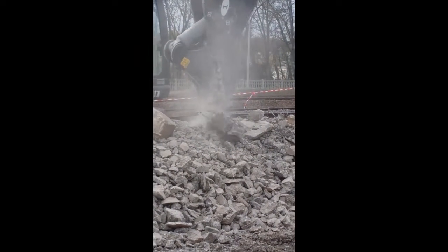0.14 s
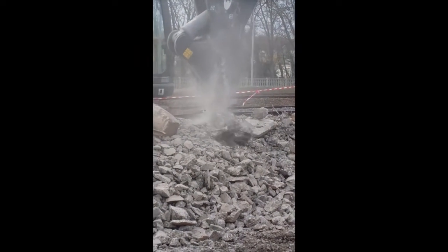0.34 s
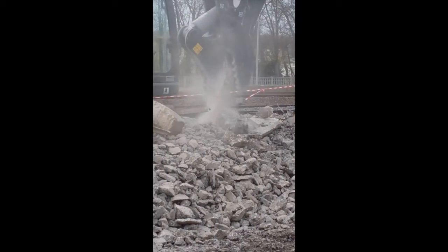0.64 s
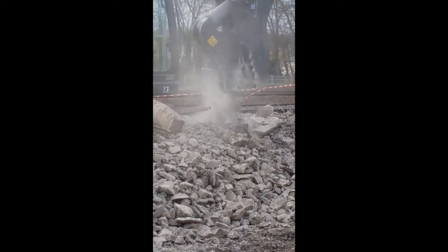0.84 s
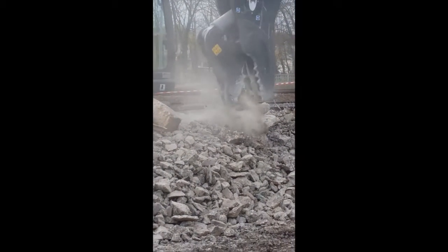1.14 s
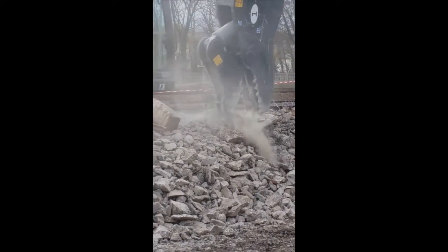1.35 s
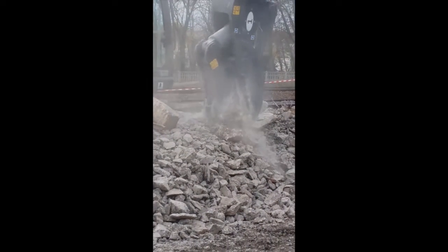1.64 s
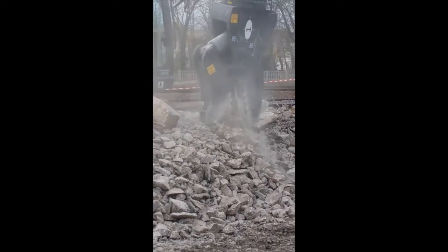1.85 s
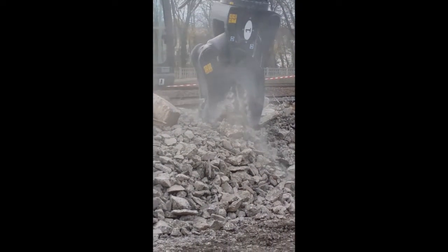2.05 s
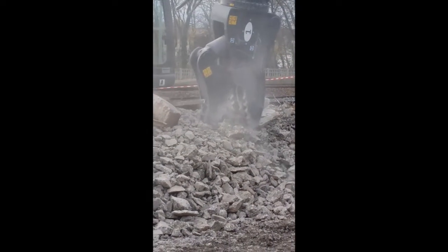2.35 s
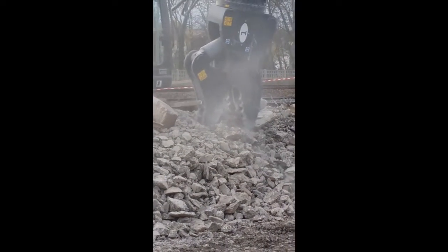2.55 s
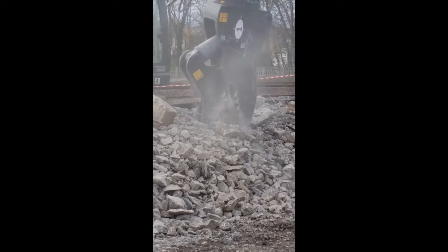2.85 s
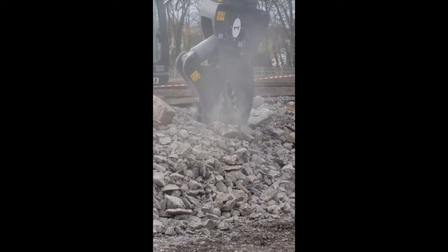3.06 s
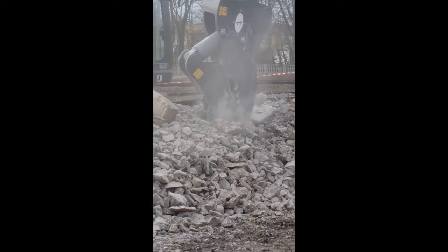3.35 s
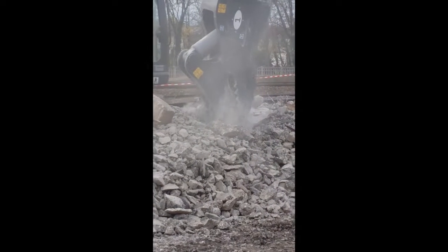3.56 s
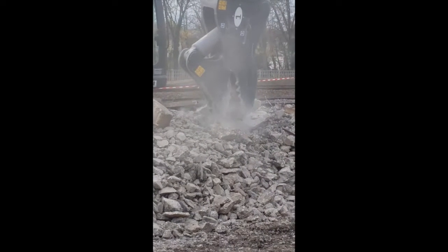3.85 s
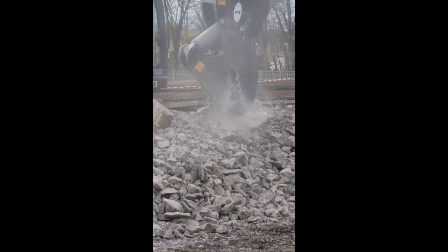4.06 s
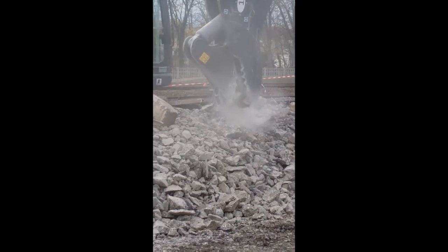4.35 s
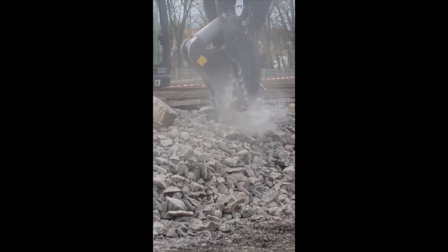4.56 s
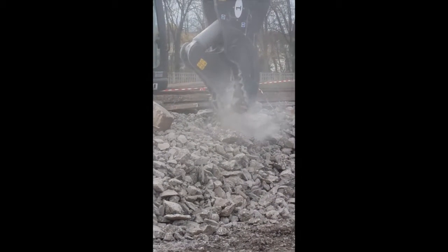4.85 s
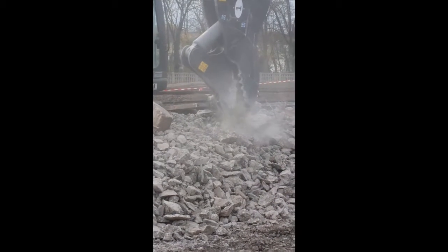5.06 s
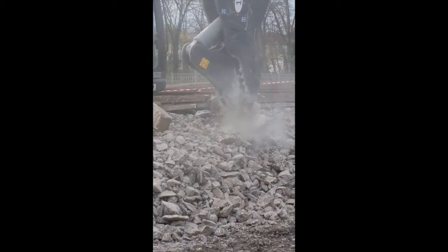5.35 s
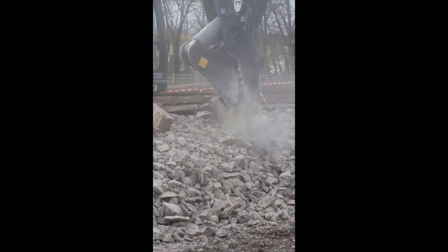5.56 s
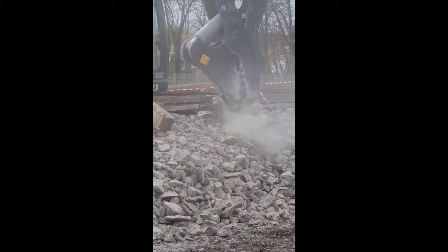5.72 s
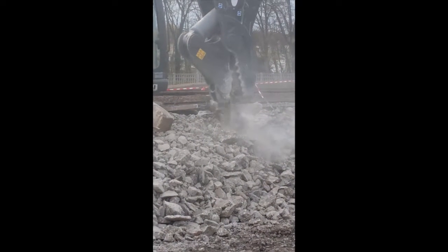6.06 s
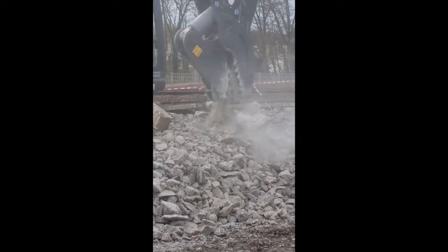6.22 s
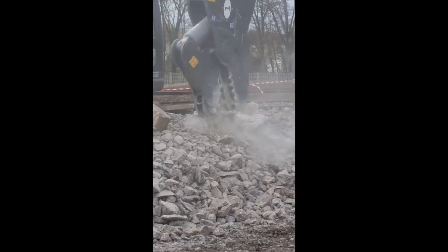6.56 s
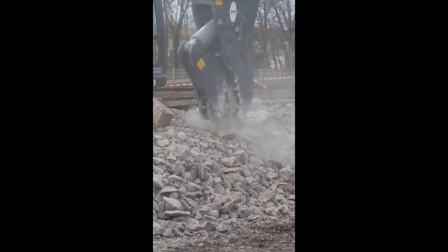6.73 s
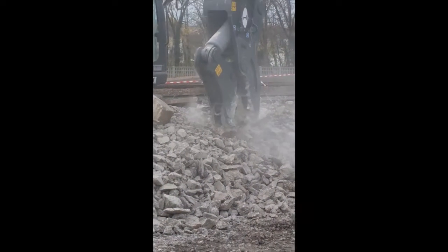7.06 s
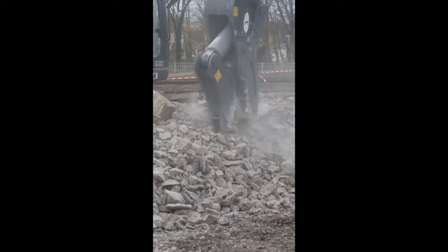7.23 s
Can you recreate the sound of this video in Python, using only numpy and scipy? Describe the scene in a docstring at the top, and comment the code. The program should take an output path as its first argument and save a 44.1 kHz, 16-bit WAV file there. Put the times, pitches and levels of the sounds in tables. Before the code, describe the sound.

An excavator engine hums low and unsteadily throughout at an open demolition site, with light microphone hiss. From about 0.4 to 1.9 seconds a thin pump whine wavers over it, with faint cracks, trickling grit, a few stony clinks and tiny high squeaks toward the right. Cracking builds from 2.5 seconds, and from 2.75 to 3.9 the jaws crush concrete in a loud, dense burst: sharp snaps, gritty crunching, short mid-pitched steel ringing and heavy low thuds through the boom. A lull follows near 4.2, with a clink at 4.4. A brief faint scraping squeal at 4.8 leads into a second crunching burst, 4.9 to 5.5. Then it quiets; the whine returns around 6 to 7.1 with light clinks, clearest near 6.75. At 7.3 the jaws bite again with a hard crack and thud. Bass and steel sound stronger at the left.

```python
"""On a demolition site a hydraulic crusher bites concrete in bursts: force-shaped noise and decaying tones
ring its steel jaws and teeth and thud through the boom. An engine hums behind with wavering tones and
filtered noise, beside a gliding pump whine; fragments clink as short tone clusters, faint squeaks glide
at the right. Two microphone ports hear most of the bass nearly alike, louder at the left, and the treble differently."""
import sys
import numpy as np
from scipy import signal
from scipy.fft import rfft, irfft, next_fast_len
from scipy.io import wavfile
from scipy.ndimage import uniform_filter1d

SR = 44100
rng = np.random.default_rng(int(sys.argv[2]) if len(sys.argv) > 2 else 0)


def pcm_store(signal):
    """Save signal as 16-bit PCM."""
    levels = np.round(np.clip(np.atleast_2d(signal), -1, 1) * 32767)
    wavfile.write(sys.argv[1], SR, levels.astype(np.int16).T)


N = 325899
T = np.arange(N) / SR
EDGE_HZ = 15600  # upper band limit
# Source levels are relative: scene() sets the final balance.


def gain_of(db):
    """Turns decibels into an amplitude factor."""
    return 10 ** (np.asarray(db) / 20)


def evened(x):
    """Scales to unit rms."""
    return x / np.sqrt(np.mean(x ** 2) + 1e-20)


def read(points, hz):
    """Reads a curve of (frequency, value) points along a log frequency axis."""
    f, value = np.transpose(points)
    return np.interp(np.log(hz + 1), np.log(f + 1), value)


def add(mix, s, sound):
    """Adds a sound into the mix from s seconds on, cut at the end."""
    part = mix[..., round(s * SR):][..., :sound.shape[-1]]
    part += sound[..., :part.shape[-1]]


def filtered(x, response):
    """Applies a frequency response given as a function of Hz."""
    size = next_fast_len(N + SR // 2)
    return irfft(rfft(x, size) * response(np.fft.rfftfreq(size, 1 / SR)), size)[..., :N]


def modes(table):
    """Response of a body: resonances of alternating sign, unit gain for white noise."""
    def response(hz):
        h = 0
        for k, (f, width, db) in enumerate(table):
            resonance = width * hz / (hz * width + 1j * (hz ** 2 - f ** 2))
            h = h + (-1) ** k * gain_of(db) * resonance
        return h / np.sqrt(np.mean(abs(h) ** 2))
    return response


def wander(per_s):
    """Slow random drift of unit rms: coarse noise smoothed twice; a higher per_s moves faster."""
    steps = rng.standard_normal(N // 64 + 2)
    steps = uniform_filter1d(steps, int(SR / 128 / per_s), mode="wrap")
    steps = uniform_filter1d(steps, int(SR / 64 / per_s), mode="wrap")
    return evened(np.interp(np.arange(N) / 64, np.arange(len(steps)), steps))


def fractures(per_s, spread_db, smooth):
    """Tiny breaks at random moments over a finer sandy scrape, by the direct and the reflected path."""
    sizes = gain_of(spread_db * np.minimum(rng.exponential(1, N), 4))
    breaks = sizes * (rng.random(N) < per_s / SR)
    puffs = signal.lfilter([1], [1, -np.exp(-1 / (0.0027 * SR))], breaks)  # each dies within milliseconds
    return evened((evened(puffs) + smooth) * rng.standard_normal((2, N)))


def grinding_power():
    """The grinding load sets the power driven into jaws, teeth, grit and boom; trickling adds grit."""
    # grinding load on the jaws: time_s, load_db
    grind = [(0.0, -57), (1.58, -58), (1.95, -53.5), (2.49, -53.5), (2.72, -49), (2.84, -47), (2.92, -44.5),
             (3.05, -42), (3.22, -43.5), (3.32, -41.5), (3.55, -41), (3.77, -42), (3.9, -46), (3.99, -49.5),
             (4.16, -60.5), (4.43, -57.5), (4.75, -52), (4.9, -54), (5.02, -40.5), (5.15, -45.5),
             (5.27, -41), (5.37, -54), (5.46, -44), (5.6, -53.5), (6.38, -59), (7.18, -59), (7.39, -43.5)]
    # how jaws, teeth, grit and boom follow the load: full_load_db, slope (dB per dB of load)
    follows = [(-40.5, 1.35), (-43.5, 1.8), (-56, 1.1), (-37, 1.09)]
    # showers of grit trickling onto the rubble: middle_s, length_s, level_db
    trickle = [(0.75, 0.62, -72.5), (1.978, 0.11, -65), (5.49, 0.3, -63.5), (6.23, 0.26, -65.5),
               (6.944, 0.95, -76.5)]
    full_load_db = -40
    load_db = np.interp(T, *np.transpose(grind)) - full_load_db
    # the load slips unevenly on each part
    levels_db = [db + slope * load_db + 2.0 * wander(per_s=48.0) for db, slope in follows]
    power = gain_of(levels_db) ** 2
    for middle, length, db in trickle:
        power[2] += gain_of(db) ** 2 * np.exp(-(2 * (T - middle) / length) ** 2)
    return power


def add_cracks(power, snaps, rings):
    """Each crack gives a sharp first break, a crumbling tail of noise and ringing tones of steel and chip."""
    # cracks: start_s, jaw_db, teeth_db, grit_db, jaw_pitch_hz, teeth_pitch_hz, base_t60_s
    cracks = [(0.2, -50.5, -78, -80, 518, 1200, 0.61), (0.5387, -76, -65, -61, 593, 1560, 0.39),
              (0.62, -64, -53.5, -57.5, 654, 1070, 0.14), (0.7447, -54, -64, -76, 610, 1200, 0.14),
              (0.9612, -49, -61, -65, 555, 1520, 0.18), (1.3159, -42.5, -57, -76, 600, 1250, 0.056),
              (1.4581, -51, -59.5, -58, 547, 1499, 0.17), (1.877, -51, -72, -70, 600, 1270, 0.11),
              (1.9066, -48, -59, -64, 520, 1360, 0.2), (1.9684, -50, -59, -68, 540, 954, 0.9),
              (2.0797, -45.5, -62, -75, 607, 1520, 0.12), (2.337, -60, -70, -75, 614, 1308, 0.13),
              (2.362, -54, -73, -75, 607, 1540, 0.12), (2.541, -43, -61, -61, 659, 1220, 0.21),
              (2.5984, -47, -64, -58, 620, 1260, 0.22), (2.6284, -40, -56, -77, 630, 970, 0.11),
              (2.747, -35.5, -42, -45.5, 612, 1306, 0.12), (2.755, -29.5, -41, -63, 554, 1153, 0.15),
              (2.8634, -63, -55, -52, 480, 1120, 0.17), (2.879, -24.5, -37.5, -41.5, 486, 1155, 0.13),
              (2.9094, -22, -40, -61, 650, 1300, 0.12), (2.925, -31, -43, -62, 680, 1224, 0.12),
              (2.9563, -20.5, -34, -42.5, 518, 1280, 0.11), (2.966, -33, -40, -56, 610, 1280, 0.11),
              (3.005, -32, -60, -65, 620, 1170, 0.12), (3.0365, -37, -48, -75, 664, 1110, 0.16),
              (3.075, -32.5, -50, -63, 594, 1150, 0.19), (3.1, -26, -48, -66, 590, 1020, 0.094),
              (3.133, -35, -54, -53, 588, 1070, 0.33), (3.2042, -28.5, -41, -52, 483, 1130, 0.088),
              (3.2525, -52, -48, -43.5, 700, 1410, 0.15), (3.258, -32, -37, -51, 714, 1040, 0.25),
              (3.272, -25.5, -44, -46, 673, 1170, 0.11), (3.299, -29.5, -33.5, -37.5, 645, 1100, 0.14),
              (3.366, -27.5, -57, -65, 776, 1120, 0.074), (3.4062, -28, -39, -50, 546, 1104, 0.16),
              (3.4543, -29, -36.5, -46, 658, 1410, 0.17), (3.467, -23.5, -38, -40.5, 633, 1494, 0.12),
              (3.5174, -32.5, -54, -65, 616, 1250, 0.37), (3.5835, -24.5, -35, -42.5, 466, 1114, 0.21),
              (3.6646, -32, -43, -57, 467, 1240, 0.22), (3.7179, -26, -39, -46, 551, 1420, 0.12),
              (3.727, -20, -48, -61, 580, 1140, 0.065), (3.7887, -61, -53, -49, 664, 1030, 0.22),
              (3.809, -27, -38, -50, 642, 1285, 0.21), (3.8894, -32, -41.5, -55, 473, 1206, 0.15),
              (4.4194, -42, -50, -52.5, 655, 1130, 0.16), (4.555, -65, -60, -80, 565, 1465, 0.16),
              (4.5914, -41.5, -70, -81, 485, 1220, 0.18), (4.697, -46, -70, -62, 600, 1136, 0.14),
              (4.772, -48.5, -53.5, -63, 653, 1103, 0.49), (4.8441, -57, -55, -60, 576, 1230, 0.19),
              (4.8733, -40, -50, -55, 546, 1258, 0.24), (4.9417, -35.5, -45, -51.5, 674, 1275, 0.21),
              (4.967, -29.5, -36.5, -49.5, 624, 1174, 0.21), (4.9931, -35, -36, -48.5, 674, 1197, 0.16),
              (5.013, -24.5, -43, -46.5, 682, 1265, 0.1), (5.0338, -29.5, -43, -59, 565, 1160, 0.14),
              (5.075, -44, -44, -62, 594, 1126, 0.16), (5.1208, -43, -55, -55, 530, 1170, 0.16),
              (5.188, -36, -48, -56, 510, 1095, 0.15), (5.2085, -33, -42, -45, 549, 1090, 0.36),
              (5.23, -24, -33, -41.5, 657, 1180, 0.12), (5.247, -25.5, -35, -40, 594, 1176, 0.17),
              (5.2794, -41, -47, -46, 679, 1359, 0.32), (5.3288, -54, -42.5, -47, 634, 1116, 0.074),
              (5.3997, -23.5, -28.5, -31.5, 678, 1128, 0.098), (5.4085, -21.5, -40, -60, 563, 1280, 0.1),
              (5.4294, -30.5, -44, -43.5, 655, 1244, 0.12), (5.82, -55, -71, -62, 608, 1270, 0.41),
              (5.91, -43, -73, -59, 524, 1160, 0.11), (6.1918, -56, -56, -54, 590, 1136, 0.1),
              (6.234, -81, -74, -55, 630, 1047, 0.099), (6.33, -74, -77, -58, 594, 1220, 0.14),
              (6.386, -51, -79, -63, 607, 1200, 0.13), (7.0768, -56.5, -60, -71, 648, 1496, 0.37),
              (7.2315, -57, -58, -61, 528, 1120, 0.14), (7.2841, -41, -48.5, -56, 447, 1064, 0.33),
              (7.3285, -45, -53, -48.5, 474, 1255, 0.2), (7.361, -25, -44, -65, 631, 1370, 0.058)]
    # jaws, teeth, grit: share of the crack's base t60
    lasts = [1.1, 0.81, 1]
    # jaws, teeth, grit: crumble_db against the crack's level
    crumble_db = [-4, 1.5, -3]
    # jaws, teeth, grit: first_break_db against the crack's level
    first_break_db = [4.5, 17, 10.5]
    t = np.arange(SR // 3) / SR
    chance = rng.random((len(cracks), 4))
    for (s, jaw, teeth, grit, jaw_hz, teeth_hz, t60), chip_tones in zip(cracks, chance):
        decay = gain_of(-60 * t / np.maximum(t60 * np.c_[lasts], .02))
        peak = gain_of([[jaw], [teeth], [grit]])
        crumble = gain_of(np.c_[crumble_db]) * peak * (1 - np.exp(-t / 0.002)) * decay
        add(power[:3], s, crumble ** 2)
        add(snaps[:3], s, gain_of(np.c_[first_break_db]) * peak)  # one sharp blow
        jaw_ring = decay[0] * np.sin(2 * np.pi * jaw_hz * t) * (1 - np.exp(-t / 0.0004))
        add(rings, s, gain_of(jaw - 5.0) * jaw_ring)
        teeth_ring = decay[1] * np.sin(2 * np.pi * teeth_hz * t) * (1 - np.exp(-t / 0.00036))
        add(rings, s, gain_of(teeth + 0.5) * teeth_ring)
        chip_hz = 1500 * 4.7 ** chip_tones  # the broken chip has its own tones
        chip = np.sin(2 * np.pi * chip_hz[:, None] * t).sum(0) * gain_of(-60 * t / .035)
        add(rings, s, gain_of(grit - 10.0) * chip)


def add_thuds(power, snaps, rings):
    """Each thud strikes the boom once, rumbles on as decaying noise and swells into one low tone."""
    # thuds through the boom: start_s, level_db, pitch_hz
    thuds = [(0.199, -33.5, 142.5), (2.049, -30.5, 196), (2.497, -33, 143), (2.754, -26, 158),
             (2.85, -23, 138), (2.879, -17.5, 154.5), (2.912, -23, 151), (2.945, -11, 149),
             (3.096, -17, 112), (3.129, -32, 118), (3.178, -20, 113), (3.212, -31, 116),
             (3.273, -10.5, 150.7), (3.308, -28, 138), (3.402, -14.5, 98), (3.469, -20.5, 154),
             (3.584, -17, 147.4), (3.724, -16, 139), (3.813, -30, 138.5), (4.387, -32.5, 131),
             (4.792, -35, 156), (4.948, -23.5, 135), (5.04, -37, 143), (5.075, -32, 142), (5.209, -25, 137),
             (5.269, -40, 140), (5.403, -18, 135), (5.812, -28.5, 127), (5.974, -40, 149), (6.09, -51, 140),
             (7.27, -40, 188), (7.334, -28.5, 132)]
    noise_t60_s, ring_t60_s = 0.18, 0.2
    t = np.arange(SR // 3) / SR
    for s, db, hz in thuds:
        add(power[3], s, gain_of(db - 11.0 - 60 * t / noise_t60_s) ** 2)
        add(snaps[3], s, gain_of([db + 2.0]))
        tone = np.sin(2 * np.pi * hz * t) * (1 - np.exp(-t / 0.011))
        add(rings, s, gain_of(db - 10.5 - 60 * t / ring_t60_s) * tone)


def slab_squeal(swarm):
    """A slab scrapes along the teeth and squeals: fractures through two resonances, fading by half."""
    # the scrape: start_s, length_s, level_db
    scrape = (4.77, 0.17, -54)
    # resonances, as set for a single pass: pitch_hz, width_hz, level_db
    squeal = [(1150, 260, 0), (4380, 320, -7.5)]
    start, length, db = scrape
    scraping = np.zeros(N)
    add(scraping, start, np.linspace(1, .5, round(length * SR)))
    tone = filtered(swarm, lambda hz: modes(squeal)(hz) ** 2)  # squared: the resonances act twice
    return gain_of(db) * scraping * evened(tone)


def crusher():
    """Grinding, cracks and thuds set the force; swarms of fractures carry it into jaws, teeth, air and boom."""
    # steel jaw resonances: pitch_hz, width_hz, level_db
    jaws = [(320, 62, -5), (481, 44.5, -2), (556.4, 28.2, -0.5), (645.5, 25.4, 3), (773.5, 86, -8)]
    # teeth resonances: pitch_hz, width_hz, level_db
    teeth = [(897, 370, -6), (1173, 155, 2), (1258, 28, 5), (1385, 184, -5.5), (1593, 163, -3.5),
             (1835, 33, -2), (2024, 270, -13.5), (2550, 960, -23)]
    # spectrum of the grit in the air: freq_hz, level_db (per Hz, relative)
    grit = [(880, -69), (1500, -11), (2190, -4.5), (2690, -10.5), (3180, -15.5), (3920, -13.5),
            (4420, -9.5), (6960, -13), (7920, -20), (14800, -31), (16000, -17.5)]
    # boom resonances: pitch_hz, width_hz, level_db
    boom = [(67.3, 24.5, -8), (98.4, 29.7, -2.5), (138.4, 16, 2.5), (193, 34.2, -3), (236.6, 75.7, -9.5)]
    power = grinding_power()
    snaps, rings = np.zeros((4, N)), np.zeros(N)
    add_cracks(power, snaps, rings)
    add_thuds(power, snaps, rings)
    swarm = fractures(per_s=700, spread_db=0, smooth=1.5)
    blows = fractures(per_s=140.0, spread_db=2.0, smooth=0.98)
    bodies = modes(jaws), modes(teeth), lambda hz: evened(gain_of(read(grit, hz))), modes(boom)
    drives = swarm, swarm, swarm, blows
    out = rings + slab_squeal(swarm)
    for p, drive, snap, body in zip(power, drives, snaps, bodies):
        force = np.sqrt(p) * drive + snap
        out = out + filtered(force, body)
    return out


def engine():
    """Low orders waver in level and pitch over a throbbing rumble."""
    # engine tones: pitch_hz, level_db, flutter_db, waver (share of the pitch)
    orders = [(30.2, -66, 1.2, .01), (70.0, -62, 3.5, .03), (140.0, -58, 4, .035),
              (198.5, -55.5, 2.6, .006)]
    # spectrum of engine and site rumble: freq_hz, level_db (per Hz, relative)
    rumble_curve = [(12, -58), (20, -17), (59, 3), (103, -2.5), (192, 1.5), (221, -45), (260, -58),
                    (313, -17.5), (442, -14), (625, -3), (702, -15), (926, -17), (1540, -20), (2500, -34.5),
                    (5000, -43), (6500, -79), (11000, -120)]
    rumble_db = -57.5
    out = np.zeros(N)
    for hz, db, flutter_db, waver in orders:
        turns = np.cumsum(hz * (1 + waver * wander(per_s=8.0))) / SR
        level = gain_of(db + flutter_db * wander(per_s=36))
        out += level * np.sqrt(2) * np.sin(2 * np.pi * turns)
    rumble = filtered(rng.standard_normal((2, N)), lambda f: gain_of(read(rumble_curve, f)))
    return out + gain_of(rumble_db + 2.5 * wander(per_s=30)) * evened(rumble)


def whine():
    """The pump whines at its piston rate with a tone at half of it; the pitch sags, then climbs."""
    # the louder spells, while the jaws travel free: start_s, end_s, level_db
    spells = [(0.36, 1.92, -60.5), (5.94, 7.15, -60)]
    # pitch of the whine, sagging as each spell starts: time_s, pitch_hz
    pitch = [(0.25, 632), (0.41, 600), (0.55, 634), (0.7, 637), (1.02, 619), (1.31, 637), (1.63, 625),
             (1.9, 640), (5.9, 632), (6.06, 600), (6.25, 630), (7.05, 626), (7.2, 602)]
    fade_s, idle_db, half_tone_db = 0.17, -73.5, -8.5  # half tone against the whine
    hz = np.interp(T, *np.transpose(pitch))
    power = np.full(N, gain_of(idle_db) ** 2)
    for start, end, db in spells:
        fade = np.clip(np.minimum(T - start, end - T) / fade_s + .5, 0, 1)
        power += (gain_of(db) * fade) ** 2
    turns = np.cumsum(hz * (1 + .005 * wander(per_s=18))) / SR
    tone = gain_of(2.0 * wander(per_s=30)) * np.sin(2 * np.pi * turns)
    half = gain_of(half_tone_db + 1.15 * wander(per_s=9.7)) * np.sin(np.pi * turns)
    return np.sqrt(2 * power) * (tone + half)


def clinks():
    """Each fragment touches with a tick and rings short, unrelated tones, roughened as it rocks."""
    # fragments: start_s, main_pitch_hz, main_db, second_pitch_hz, second_db, further_db
    fragments = [(0.6, 4400, -63, 5270, -67, -85), (1.181, 4390, -62, 6600, -75, -85),
                 (1.302, 5320, -63, 7800, -75, -85), (1.828, 5300, -61, 7800, -78, -85),
                 (4.431, 4190, -55, 5350, -67, -66), (4.818, 4420, -63, 8650, -70, -78),
                 (4.907, 3270, -69, 4500, -67, -80), (5.919, 3380, -71, 6800, -64, -80),
                 (6.1094, 3660, -63, 7240, -59, -80), (6.19, 3730, -54.5, 7360, -66, -70),
                 (6.236, 9270, -59, 12830, -57, -80), (6.758, 4040, -52, 6270, -54, -59.5),
                 (6.782, 4050, -55, 6300, -70, -66), (7.108, 3320, -69, 6660, -64, -80),
                 (7.233, 2606, -56, 6190, -62, -75), (7.24, 5170, -57, 8450, -64, -71),
                 (7.2682, 2670, -61, 5050, -60, -75)]
    # further tones: ratio to the main pitch, level_db against further_db
    stone = [(0.978, 2), (1.24, -1), (1.476, 2), (1.77, -1), (2.29, -1)]
    t60_s, upper_die_faster = 0.082, 0.5  # t60 at 4 kHz; exponent of its shortening with pitch
    stray, tick_db = 0.008, -5.5  # mistuning as a share of the pitch; tick against the main tone
    out, t = np.zeros(N), np.arange(SR // 6) / SR
    chance = rng.uniform(-0.94, 1, (len(fragments), len(stone)))
    tick = evened(np.diff(rng.standard_normal(len(t) + 1)))  # the touch itself
    for (s, hz, db, second_hz, second_db, further_db), row in zip(fragments, chance):
        tones = [(hz, db), (second_hz, second_db)]
        for (ratio, d), off in zip(stone, row):
            tones.append((hz * ratio * (1 + stray * off), further_db + d))
        ring = np.zeros(len(t))
        for f, d in tones:
            if f < EDGE_HZ:
                fall_db = 60 * t * (f / 4000) ** upper_die_faster / t60_s
                ring += gain_of(d - fall_db) * np.sin(2 * np.pi * f * t)
        add(out, s, ring * (1 - np.exp(-t / 0.00022)))
        add(out, s, gain_of(db + tick_db - 60 * t / 0.023) * tick)
    return out * gain_of(2.5 * wander(per_s=250))


def scattered(x):
    """Reflections off rubble and machine: a short dying cloud of random taps."""
    t = np.arange(SR // 8) / SR
    taps = rng.standard_normal(len(t)) * gain_of(-60 * t / 0.14)
    return signal.oaconvolve(x, taps / np.linalg.norm(taps))[:N]


def squeaks():
    """Short rough glides with an octave above."""
    # squeaks: start_s, length_s, from_pitch_hz, to_pitch_hz, level_db
    glides = [(0.622, 0.035, 3330, 3250, -66), (0.81, 0.02, 3150, 3150, -69),
              (0.901, 0.069, 3270, 3270, -63), (1.237, 0.028, 3100, 3130, -68),
              (1.418, 0.063, 3350, 3500, -65.5), (1.697, 0.035, 3060, 3140, -67),
              (1.859, 0.036, 3180, 3260, -70), (6.333, 0.045, 3250, 3250, -68)]
    out, rough = np.zeros(N), wander(per_s=150)
    shaky = 1 + .011 * wander(per_s=250)
    for s, length, from_hz, to_hz, db in glides:
        size = round(length * SR)
        hz = np.linspace(from_hz, to_hz, size) * shaky[round(s * SR):][:size]
        turns = np.cumsum(hz) / SR
        tone = np.sin(2 * np.pi * turns) + gain_of(-6.0) * np.sin(4 * np.pi * turns)
        add(out, s, gain_of(db - 5.5) * tone * signal.windows.tukey(len(hz), .4))
    return out * gain_of(2.5 * rough)


def scene():
    """The right port hears a re-levelled, phase-shifted copy of the left, blended with the reflections."""
    # level of the left port over the right: freq_hz, level_db
    left_over_right = [(40, 7.5), (230, 12.5), (350, 8.5), (650, 11.5), (850, 10), (1120, 20), (1370, 14),
                       (1550, 22), (1800, 10), (2700, 0), (3250, -8), (3800, 1), (7000, 0), (15000, -2)]
    # phase lead of the left port: freq_hz, lead_rad
    left_leads = [(40, .45), (200, .3), (300, .07), (700, .25), (850, .8), (1050, 2.8), (1480, 5.5),
                  (1600, 3.4), (2900, 3.6), (4300, 4.4), (7800, 3.2), (9300, 0), (16000, -19)]
    # how alike the ports hear: freq_hz, likeness (0-1)
    likeness = [(30, .7), (80, .985), (600, .975), (1000, .88), (1400, .65), (2200, .7), (3400, .45),
                (5000, .6), (8000, .4), (15000, .25)]

    def alike(hz):
        return np.clip(read(likeness, hz), 0, 1)

    def right_gain(hz):
        return gain_of(-read(left_over_right, hz))

    fragments = clinks()
    fragment_paths = np.array([fragments, scattered(fragments)])
    left, reflected = gain_of(3.0) * (engine() + whine() + crusher() + fragment_paths)
    right = filtered(left, lambda hz: right_gain(hz) * alike(hz) * np.exp(-1j * read(left_leads, hz)))
    right += filtered(reflected, lambda hz: right_gain(hz) * np.sqrt(1 - alike(hz) ** 2))
    return np.array([left, right]) + squeaks() * gain_of([[-3.0], [4.0]])  # squeaks lean right


def record(dry):
    """Each microphone adds its own hiss; then the band limit."""
    # spectrum of the microphone hiss: freq_hz, level_db (per Hz, relative)
    hiss_curve = [(800, 4.5), (2000, -1.5), (4000, -4), (8000, -2.5), (11000, -4), (15500, 0)]
    hiss_db = -64
    hiss = filtered(rng.standard_normal((2, N)), lambda hz: gain_of(read(hiss_curve, hz)) * hz / (hz + 500))
    wet = dry + gain_of(hiss_db) * evened(hiss)
    band_limit = signal.firwin(1023, EDGE_HZ, window=("kaiser", 11), fs=SR)
    return signal.oaconvolve(wet, band_limit[None], "same")


dry = scene()
out = record(dry)
pcm_store(out)
```